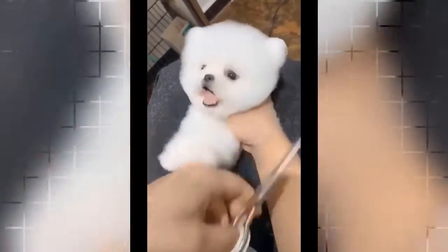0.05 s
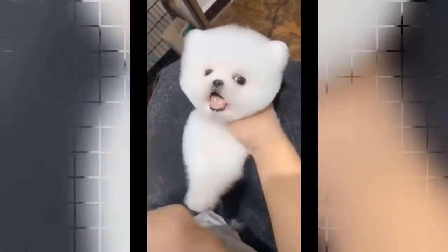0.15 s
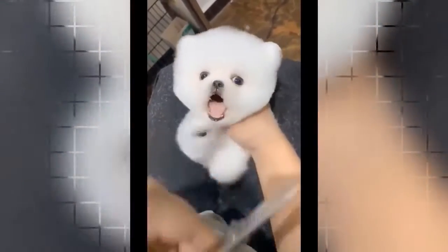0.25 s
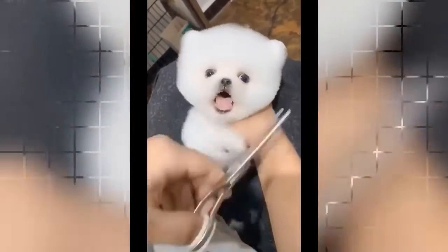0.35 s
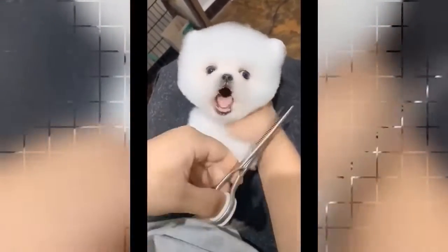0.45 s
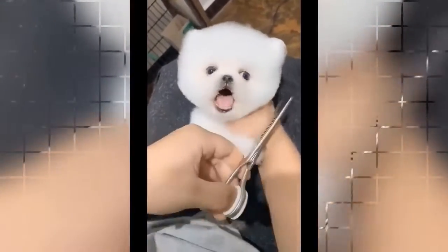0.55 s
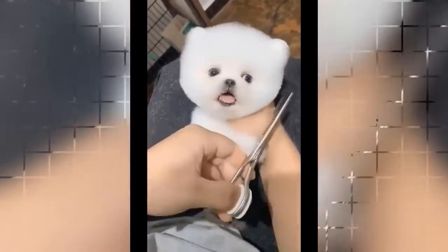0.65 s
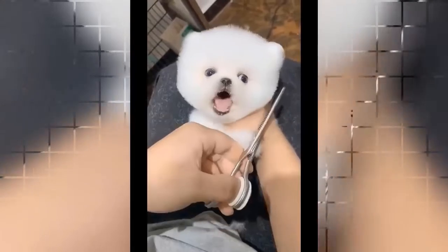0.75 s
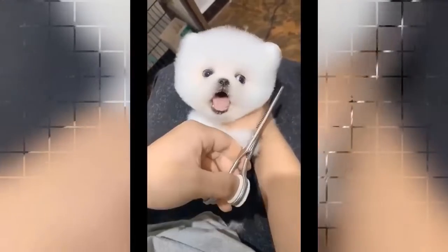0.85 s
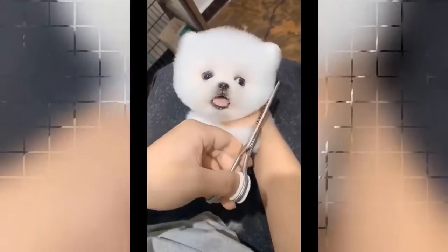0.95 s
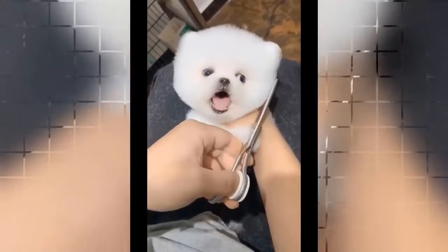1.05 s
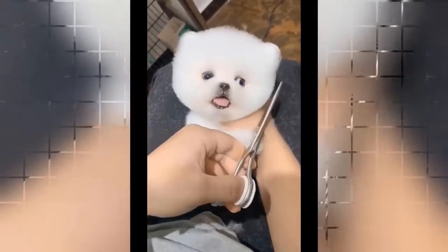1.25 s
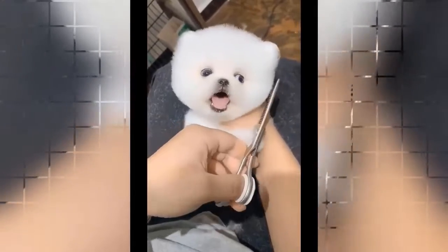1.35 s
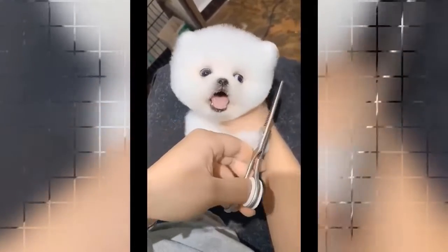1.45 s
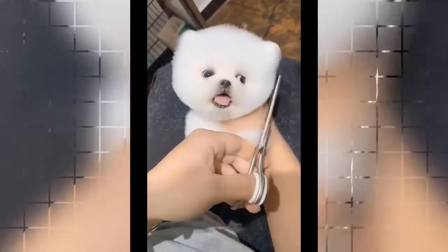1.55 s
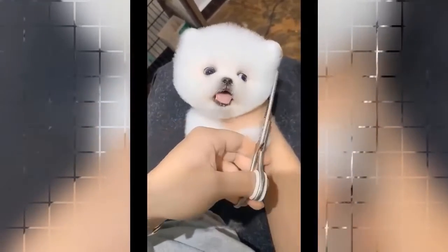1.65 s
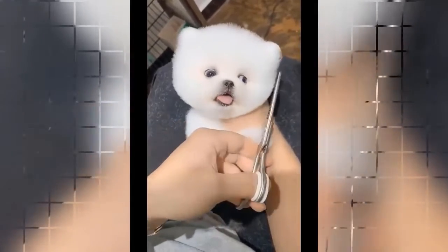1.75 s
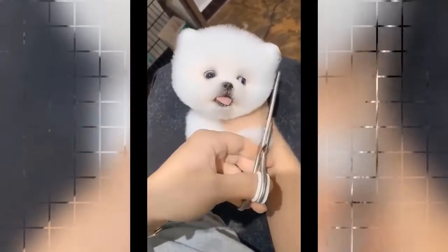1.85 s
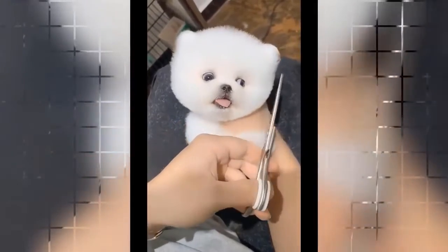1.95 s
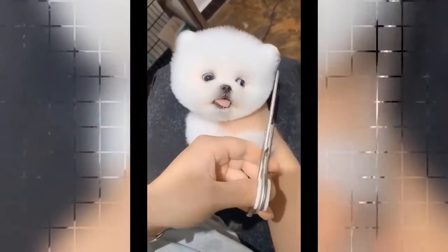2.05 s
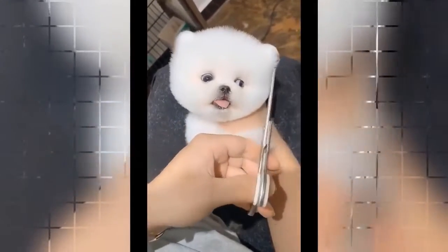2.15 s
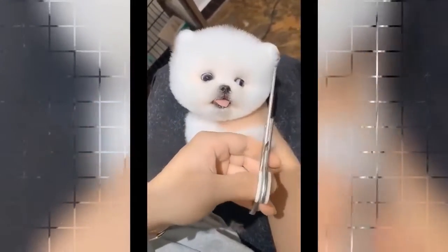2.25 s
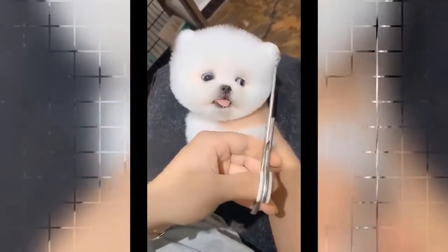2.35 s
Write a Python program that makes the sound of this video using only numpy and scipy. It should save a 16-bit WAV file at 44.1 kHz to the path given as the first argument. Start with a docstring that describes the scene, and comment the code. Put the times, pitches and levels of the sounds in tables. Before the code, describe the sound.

A small puppy close to a phone microphone gives seven short, shrill yaps about three per second, then a weak half-closed whimper; faint panting hiss between them, short room echo and very low quiet hum.

```python
"""Eight short, high yaps from a small puppy close to a phone, the last a half-closed whimper. Each yap is an
arch of pitch: partials clear at the top, hoarse and breathy at the ends; some break into uneven cycles. Faint
bands of panting hiss lie between them, and soft noise bands sound at the onsets of the first and fifth yaps. A
furnished room adds short echoes and a low hum of shaped noise."""
import sys
import numpy as np
from scipy import signal
from scipy.fft import rfft, irfft
from scipy.io import wavfile
from scipy.ndimage import uniform_filter1d, map_coordinates

SR = 44100
rng = np.random.default_rng(int(sys.argv[2]) if len(sys.argv) > 2 else 0)


def dump(signal):
    """Clip the signal to [-1, 1] and save it as 16-bit WAV at the path in sys.argv[1]."""
    limited = np.clip(np.atleast_2d(signal).T, -1, 1)
    pcm = np.round(limited * 32767).astype(np.int16)
    wavfile.write(sys.argv[1], SR, pcm)


N = 103635
TOP_HZ = 14100


def undb(db):
    """dB to gain."""
    return 10 ** (np.asarray(db) / 20)


def read(table, hz):
    """Interpolate a (Hz, value) table on a log-frequency axis."""
    table = np.array(table, float)
    return np.interp(np.log(np.maximum(hz, 1)), np.log(table[:, 0]), table[:, 1])


def noise(table):
    """Noise of rms 1 with the colour of a (Hz, dB) table."""
    spectrum = rfft(rng.standard_normal(N))
    x = irfft(spectrum * undb(read(table, np.fft.rfftfreq(N, 1 / SR))), N)
    return x / x.std()


def wobble(hz):
    """Random curve of rms 1: white noise low-passed at hz."""
    x = signal.sosfilt(signal.butter(2, hz, fs=SR, output="sos"), rng.standard_normal(N))
    return x / x.std()


def hump(t, start_s, length_s):
    """Rounded window: root of a half sine."""
    return np.sin(np.pi * np.clip((t - start_s) / length_s, 0, 1)) ** .5


# voice breaks: start_s, length_s, depth (0-1), cycles per strong-weak pattern
BREAKS = [(.295, .017, .9, 2), (.865, .035, .2, 3), (1.142, .045, .75, 3), (1.455, .035, .25, 3),
          (1.742, .05, .75, 3), (2.325, .04, .5, 3)]
STUMBLE_RAD, STUMBLE_HZ = .9, 60  # rms slip of a broken pattern, and its speed


def break_depth(t):
    """Depth of the voice breaks over time."""
    return sum(depth * hump(t, start_s, length_s) for start_s, length_s, depth, _ in BREAKS)


def uneven_cycles(t, phase, stumble):
    """Subharmonic gain: fold cycles alternate strong and weak; the sum is scaled back to even power."""
    gain = 1
    for start_s, length_s, depth, cycles in BREAKS:
        pattern = np.sqrt(2) * np.cos(phase / cycles + stumble)
        gain = gain + depth * hump(t, start_s, length_s) * pattern
    return gain / np.hypot(1, break_depth(t))


# roughness: slope per share of pitch below the top (rise, fall), then its base value
HOARSE_RISE, HOARSE_FALL, HOARSE_TOP = 1.3, 2.2, .075


def roughness(t, hz, fall):
    """Fold irregularity 0-1: grows as pitch leaves the top of the arch, and in voice breaks."""
    slope = np.where(np.arange(len(hz)) < hz.argmax(), HOARSE_RISE, HOARSE_FALL * fall)
    slack = slope * (1 - hz / hz.max())
    return np.clip(HOARSE_TOP + slack ** 2 + break_depth(t) / 2, 0, 1)


TREBLE_HZ = 4260
RING_HZ, RING_WIDTH_HZ, RING_SWELL_DB = 5550, 600, 12
SMEAR_DB, SMEAR_HZ = -55, 4500  # loss at full roughness from SMEAR_HZ up; below, it follows frequency squared


def above(partial_hz, edge_hz):
    """Smooth step, 0 below the edge to 1 above."""
    return 1 / (1 + (edge_hz / partial_hz) ** 12)


def partial_colour_db(k, partial_hz, bright_db, presence_db, treble_db, presence_hz, ring_db, rough):
    """Tilt of the partials: overtones, presence, treble, the piercing ring, and loss of highs to roughness."""
    db = bright_db * (k > 1)
    db = db + presence_db * above(partial_hz, presence_hz)
    db = db + (treble_db - presence_db) * above(partial_hz, TREBLE_HZ)
    db = db + ring_db * np.exp(-((partial_hz - RING_HZ) / RING_WIDTH_HZ) ** 2)
    return db + SMEAR_DB * rough * np.minimum((partial_hz / SMEAR_HZ) ** 2, 1)


# one list per yap: start_s, pitch_hz, level_db, overtones_db, presence_db, treble_db (above TREBLE_HZ)
YAPS = [
    [(0.215, 567, -38, 9, -3, 10), (0.224, 649, -29.5, 2.5, -37, 4), (0.238, 788, -26.5, 1, 5, 4),
     (0.252, 911.6, -21, 8, -1, -2), (0.274, 948.4, -17.5, 8, 5, -12.5), (0.29, 944, -19.5, 7, 0, -2.5),
     (0.3, 894.5, -25.5, 11.5, 33, 6), (0.314, 835.4, -25, -1, 13.5, 3.5), (0.33, 798, -27, -4, -5, -5),
     (0.345, 774, -27.5, 5, 10, -8), (0.364, 757, -30.5, 0, -18, -12), (0.384, 739, -31, -0.5, -4, -10),
     (0.396, 755, -54, 0, 6, 13), (0.408, 765, -37.5, 0, -4, -6), (0.425, 790, -61, 5, -1, -4)],
    [(0.5, 431, -38.5, -6, 27, -13), (0.51, 611, -27.5, 11, 18, -9), (0.522, 755, -25.5, -7, -4, -1),
     (0.536, 863.3, -19, 12, 12, -7), (0.549, 838, -25, 0.5, 4, -3.5), (0.566, 868, -20, 8.5, -1, -10.5),
     (0.584, 807.3, -20, -4, 28, -33), (0.602, 674, -25.5, 3, -9, 5.5), (0.624, 492, -30.5, 0.5, 4, 4),
     (0.634, 506, -33.5, 8, 0, -7), (0.65, 435, -43.5, -16, -3, 6)],
    [(0.759, 449, -42, 7, 0, -7), (0.765, 545, -28.5, 0.5, 15, 1), (0.771, 638.4, -30, 7, 4, 2),
     (0.785, 789, -23.5, 1.5, -13, -6), (0.793, 859.5, -20.5, 10, 6, -6), (0.819, 902.7, -19.5, 3, -2, -11),
     (0.837, 903, -18, 2, 13, -1.5), (0.877, 641, -28, 2.5, -0.5, 6.5), (0.891, 547, -43, 7, -5, 12.5),
     (0.905, 490, -46, -14, -9, 6)],
    [(1.065, 470.5, -32, 8, 10, 4), (1.074, 574.4, -31.5, 4.5, 1, -2), (1.09, 732, -25.5, 0.5, 1.5, 2),
     (1.106, 861.7, -20.5, 7, -6, -4), (1.124, 890.5, -19, 9, -2, -13), (1.14, 863, -22.5, -2.5, 0, 4.5),
     (1.152, 772.6, -25.5, 10, -8, 7), (1.172, 633, -27.5, -4, -2, -50), (1.195, 536, -50.5, 2, -9, 26)],
    [(1.365, 474.6, -47, 16, -11, -23), (1.377, 589, -28.5, 7, -14.5, 8.5), (1.389, 748, -25.5, 0.5, -7, 0),
     (1.415, 845.7, -18.5, 10, 1.5, -0.5), (1.431, 794, -20.5, -0.5, -8.5, -1),
     (1.461, 630, -29.5, 2.5, 9.5, 12.5), (1.475, 596, -36, -8, -5, -12),
     (1.495, 503, -50.5, -14.5, -7, -11)],
    [(1.664, 489.4, -39, 25, 11.5, 2), (1.674, 576.4, -32, 5, 5, -14), (1.684, 677, -24.5, 3.5, -9, 3),
     (1.696, 840.4, -24, 2.5, -1.5, 3.5), (1.72, 895.7, -17.5, 8.5, -5, -5), (1.74, 876.4, -22.5, 8, -4, 3),
     (1.78, 591.7, -33, -8.5, 21, -29), (1.795, 565, -60, -6.5, 0, -5)],
    [(1.977, 485, -39.5, 13, 15.5, 2), (1.987, 526.4, -33, 5, -20, 8.5), (2.005, 681, -25.5, 4, -9, -4.5),
     (2.015, 697, -22, 13, -11.5, -6), (2.041, 667.7, -26, -1.5, -5, -8), (2.051, 601, -28, 7, -4.5, 5),
     (2.073, 476, -31.5, -5.5, 8.5, -1.5), (2.095, 392, -56, -26.5, 1, 3)],
]
# final half-closed whimper: start_s, pitch_hz, level_db, overtones_db, presence_db, treble_db
WHIMPER = [(2.273, 422, -66, 21, -9, -22), (2.281, 379, -43.5, 3, -7, -22),
           (2.288, 432, -31.5, -9, -13, -13), (2.305, 440, -36, -3, -9, 0),
           (2.312, 498, -37.5, 17.5, -22, -9), (2.322, 554, -42.5, 2, -15, -16),
           (2.333, 479, -44, 16, -22, -2), (2.352, 460, -48, 12, -21, -2)]
# mouth per yap, whimper last: presence_edge_hz, ring_db, fall_hoarseness (0-1)
MOUTHS = [(3000, -3, .45), (3000, -5, .8), (2900, 2, 1), (2900, 7, 1), (2900, 6, 1), (2900, 8, 1),
          (2250, 5, 1), (1600, -6, .7)]
# throat resonances: freq_hz, relative_db
THROAT = [(300, -15), (500, 12.5), (860, -10.5), (1050, -8), (1700, -4), (2500, -4.5), (2750, -8.5),
          (3080, -8), (3350, -7.5), (3700, -7), (4200, -11), (5500, -15), (6300, -24), (7400, -20),
          (9500, -20), (11000, -27.5), (12500, -34.5), (14000, -57.5)]
# breath noise colour: freq_hz, relative_db_per_hz
BREATH = [(300, -56.5), (600, -17), (850, -11), (1100, -5), (1600, 12), (2600, -22), (3500, 19.5),
          (5300, 7), (7500, 11.5), (10000, 9), (12500, -7.5), (14000, -60.5)]
JITTER, SHIMMER_DB, FLUTTER_HZ = .045, 3, 500  # rms pitch share and level at full roughness
PUFF = .8  # breath modulation depth per cycle
BREATH_CLEAR_DB, BREATH_HOARSE_DB = -27, -8  # breath gain at roughness 0 and 1
# flicker rms per partial number (up to 4), scaled by CALM + roughness; phase lag per number squared
PATCHY_DB, PATCHY_HZ, CALM, SPREAD_RAD = 1.6, 70, .4, .36
EDGE_S = .0032


def puppy(t):
    """Vocal-fold partials through the throat; off the arch's top they shake and leak puffs of breath."""
    out = np.zeros(N)
    shake, swell, air = wobble(FLUTTER_HZ), wobble(FLUTTER_HZ), noise(BREATH)
    k = np.arange(1, 34)[:, None]  # partial numbers
    flicker_db = PATCHY_DB * np.minimum(k, 4) * np.array([wobble(PATCHY_HZ) for _ in k])
    stumble = STUMBLE_RAD * wobble(STUMBLE_HZ)
    ring_air = signal.lfilter(*signal.iirpeak(RING_HZ, RING_HZ / RING_WIDTH_HZ / 2, fs=SR), air)
    treble_air = signal.sosfilt(signal.butter(4, TREBLE_HZ, "high", fs=SR, output="sos"), air)

    for yap, (presence_hz, ring_db, fall) in zip([*YAPS, WHIMPER], MOUTHS):
        yap = np.array(yap, float)
        start_s, end_s = yap[0, 0], yap[-1, 0]
        on = (t >= start_s) & (t < end_s)
        now = t[on]
        curves = [np.interp(now, yap[:, 0], column) for column in yap.T[1:]]
        hz, level_db, bright_db, presence_db, treble_db = curves
        hz = uniform_filter1d(hz, size=300, mode="nearest")
        ring_db = ring_db + RING_SWELL_DB * np.linspace(-.6, .5, len(hz))  # shriller as the yap goes on
        rough = roughness(now, hz, fall)
        phase = 2 * np.pi * np.cumsum(hz * (1 + JITTER * rough * shake[on])) / SR

        partial_hz = k * hz
        colour_db = partial_colour_db(
            k, partial_hz, bright_db, presence_db, treble_db, presence_hz, ring_db, rough)
        size_db = read(THROAT, partial_hz) + colour_db + flicker_db[:, on] * (CALM + rough)
        size = undb(size_db) * (partial_hz < TOP_HZ)
        voice = np.sum(size * -np.cos(k * phase + SPREAD_RAD * k ** 2), axis=0)
        voice = voice / np.sqrt(np.sum(size ** 2, axis=0) / 2)  # level is set by level_db alone
        voice = voice * uneven_cycles(now, phase, stumble[on])
        voice = voice * undb(SHIMMER_DB * rough * swell[on])

        breath = air[on] + treble_air[on] * (undb(treble_db) - 1) + ring_air[on] * (undb(ring_db) - 1)
        breath_db = BREATH_CLEAR_DB + (BREATH_HOARSE_DB - BREATH_CLEAR_DB) * rough ** .5
        breath_db = breath_db + np.minimum(bright_db, 0)
        puffs = breath * undb(breath_db) * (1 + PUFF * np.cos(phase))

        edge = np.clip(np.minimum(now - start_s, end_s - now) / EDGE_S, 0, 1)
        out[on] = (voice + puffs) * undb(level_db) * edge
    return out


# panting and nose hiss, plus soft noise bands at the onsets of the first and fifth yaps: start_s, length_s,
# level_db, centre_hz, width_hz
SOFT_BANDS = [(0.025, 0.048, -66.5, 9300, 5030), (0.174, 0.12, -43.5, 2230, 90),
              (0.191, 0.081, -42.5, 3500, 3050), (0.423, 0.092, -65, 7100, 1500),
              (0.692, 0.048, -75, 7400, 4960), (0.948, 0.08, -68.5, 7550, 5000),
              (1.336, 0.068, -46.5, 2680, 3070), (1.545, 0.037, -65.5, 8640, 6000),
              (1.831, 0.029, -63, 9600, 3930), (1.895, 0.23, -63, 9760, 4300),
              (2.208, 0.061, -72.5, 10150, 4000)]


def soft_bands(t):
    """Soft bands of noise that swell and fade: breath turbulence between the yaps, and bands at the onsets of
    the first and fifth yaps."""
    f, out = np.fft.rfftfreq(N, 1 / SR), 0
    for start_s, length_s, level_db, centre_hz, width_hz in SOFT_BANDS:
        band = 1 / (1 + ((f - centre_hz) / width_hz * 2) ** 2)
        hiss = irfft(rfft(rng.standard_normal(N)) * band, N)
        out = out + hiss / hiss.std() * undb(level_db) * hump(t, start_s, length_s) ** 3
    return out


# narrow dips, and one peak, from nearby surfaces: centre_hz, width_hz, gain_db
SURFACES = [(2910, 308, -11), (4520, 400, -10), (6330, 290, -8), (8120, 140, -20), (13200, 330, 10)]
LOW_CUT_HZ = 340


def nearby(x):
    """A small head gives little bass; close surfaces cut or lift narrow bands."""
    x = signal.sosfilt(signal.butter(4, LOW_CUT_HZ, "high", fs=SR, output="sos"), x)
    for centre_hz, width_hz, gain_db in SURFACES:
        band = signal.lfilter(*signal.iirpeak(centre_hz, centre_hz / width_hz, fs=SR), x)
        x = x - (1 - undb(gain_db)) * band
    return x


# reverberation time by band: freq_hz, t60_s
ROOM_DECAY = [(300, 0.17), (1000, 0.31), (1800, 0.27), (2700, 0.33), (4000, 0.25), (5600, 0.19),
              (8000, 0.2), (14000, 0.18)]
ROOM_DB, ROOM_LATE_S = -12, .0029
SWAY_S, SWAY_HZ = .00018, 30  # the moving head wavers the path into the room: rms delay, speed
ABSORB_HZ, ABSORB_WIDTH_HZ, ABSORB_SHARE = 3550, 500, .55  # band soaked up by the furnishings


def room(x):
    """Dense echoes as decaying noise; each half-octave band dies at its own rate."""
    size = SR // 2
    x = map_coordinates(x, [np.arange(N) + SWAY_S * SR * wobble(SWAY_HZ)], mode="nearest")
    absorbed = signal.lfilter(*signal.iirpeak(ABSORB_HZ, ABSORB_HZ / ABSORB_WIDTH_HZ, fs=SR), x)
    x = x - ABSORB_SHARE * absorbed
    t, f = np.arange(size) / SR, np.fft.rfftfreq(size, 1 / SR)
    white, tail = rfft(rng.standard_normal(size)), 0
    for hz in 250 * 2. ** np.arange(6.5, step=.5):
        band = np.clip(1 - 2 * np.abs(np.log2(np.maximum(f, 1) / hz)), 0, 1)
        tail = tail + irfft(white * band, size) * undb(-60 * t / read(ROOM_DECAY, hz))
    tail = tail * np.clip(t / ROOM_LATE_S - 1, 0, 1)  # silent to ROOM_LATE_S, full at twice that
    tail = tail / np.sqrt(np.sum(tail ** 2))
    return signal.fftconvolve(x, tail)[:N] * undb(ROOM_DB)


# room hum colour: freq_hz, relative_db_per_hz
HUM = [(18, -46), (28, -38), (40, 2), (52, -4.5), (68, -11), (95, -21), (200, -22), (400, -28.5),
       (1200, -33), (3000, -41.5), (8000, -47.5), (12500, -49.5), (14000, -105)]
HUM_DB = -57.5


def room_hum():
    """Steady noise, strongest around 40-50 Hz."""
    return noise(HUM) * undb(HUM_DB)


def scene():
    """Puppy, its echoes and the low room hum."""
    t = np.arange(N) / SR
    dog = nearby(puppy(t) + soft_bands(t))
    return (dog + room(dog) + room_hum())[None]


def record(dry):
    """The phone cuts the top: steep low-pass at TOP_HZ."""
    return signal.sosfilt(signal.ellip(10, .2, 80, TOP_HZ, fs=SR, output="sos"), dry)


dry = scene()
out = record(dry)
dump(out)
```